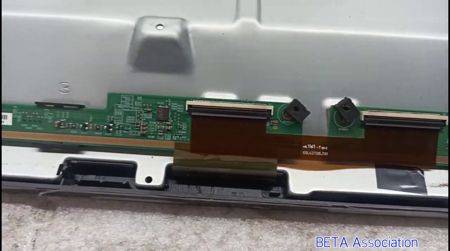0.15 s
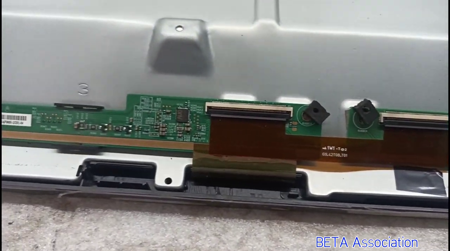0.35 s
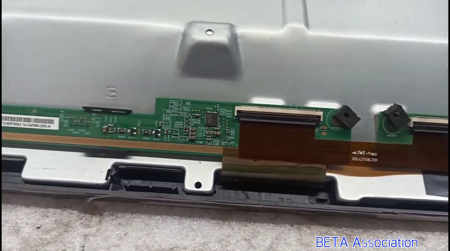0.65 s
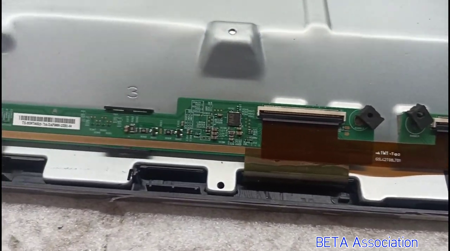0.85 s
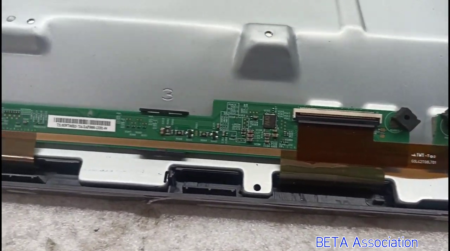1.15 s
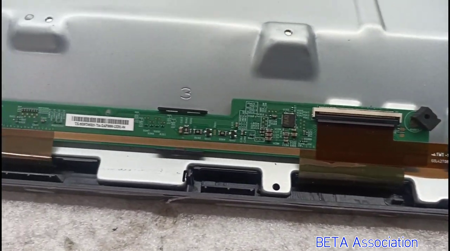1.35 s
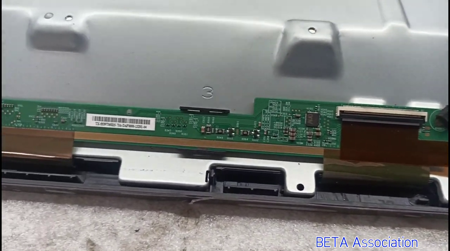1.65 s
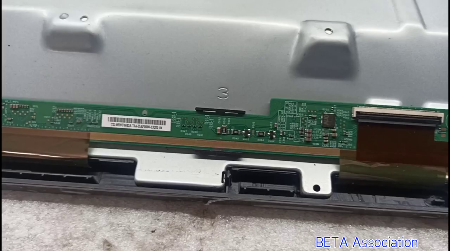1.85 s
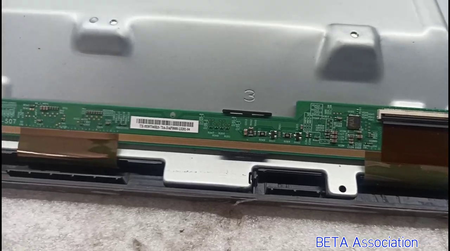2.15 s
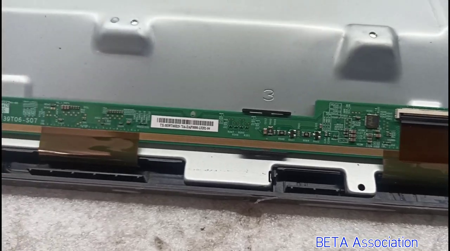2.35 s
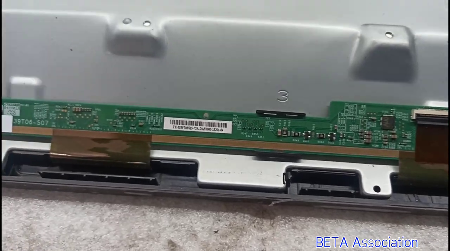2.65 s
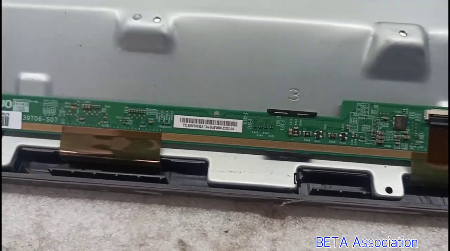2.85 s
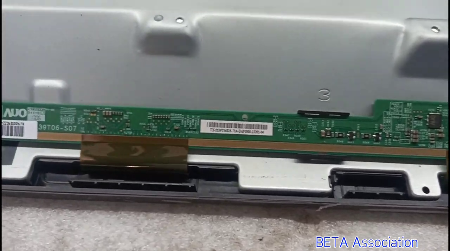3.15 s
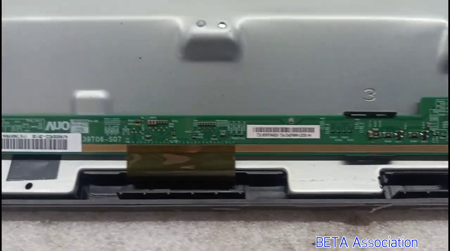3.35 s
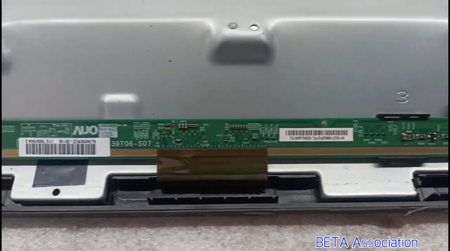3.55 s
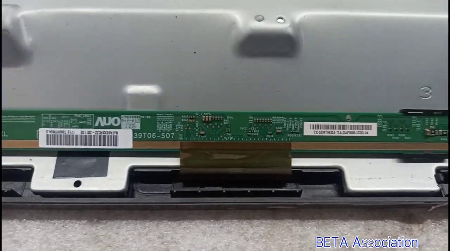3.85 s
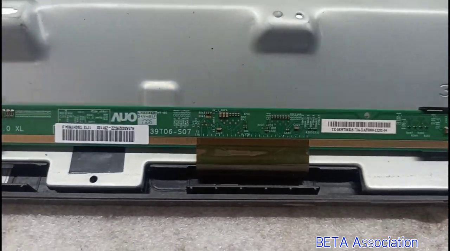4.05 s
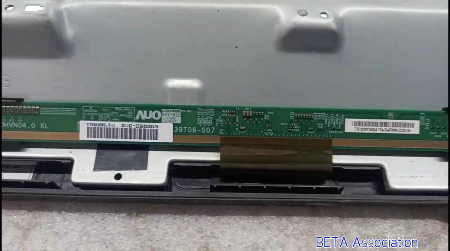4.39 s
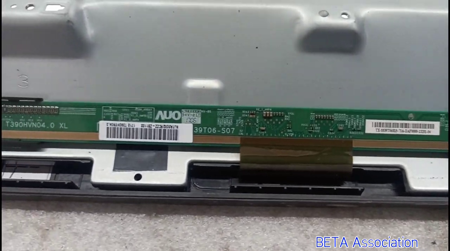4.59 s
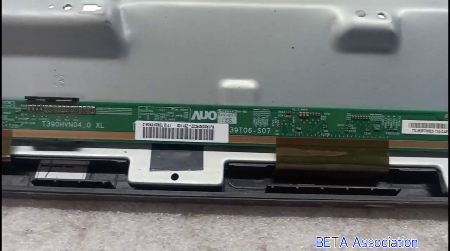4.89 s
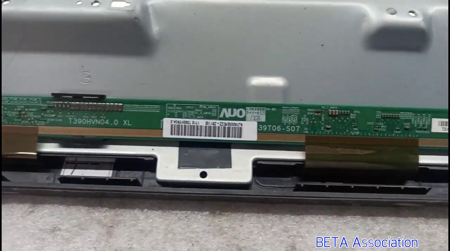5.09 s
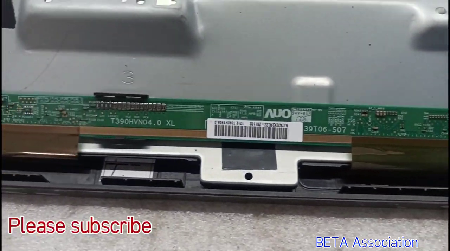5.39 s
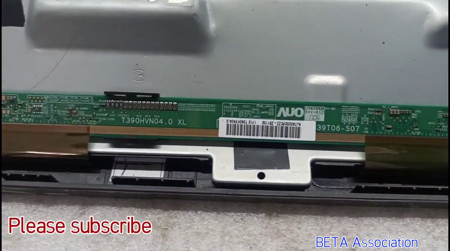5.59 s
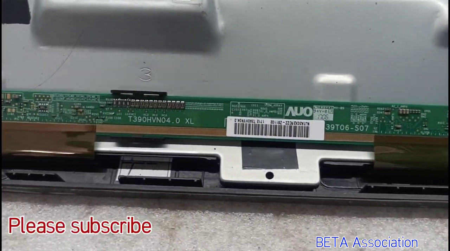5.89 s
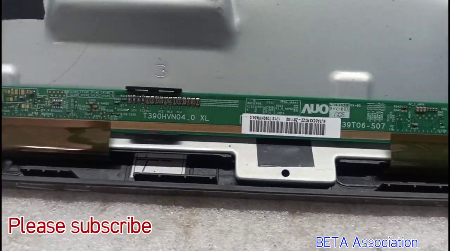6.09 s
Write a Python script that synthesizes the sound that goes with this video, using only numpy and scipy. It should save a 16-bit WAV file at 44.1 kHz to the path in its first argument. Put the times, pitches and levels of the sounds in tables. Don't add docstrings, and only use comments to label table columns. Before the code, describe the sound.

From an open workshop, a slow engine drones away down the street, its low buzzing hum fluttering and weakening. A faster vehicle swishes past in the first second, its pitch sinking. Tyre noise and soft hiss remain. Midway, cloth and soles scuff close to the microphone with a tiny rattle; near the end comes a knock ending in a sharp click.

```python
import sys
import numpy as np
from scipy import signal
from scipy.fft import rfft, irfft, next_fast_len
from scipy.io import wavfile
from scipy.ndimage import uniform_filter1d, map_coordinates

SR = 44100
rng = np.random.default_rng(int(sys.argv[2]) if len(sys.argv) > 2 else 0)


def bounce(signal):
    frames = np.transpose(np.atleast_2d(signal))
    limited = np.clip(frames, -1, 1)
    pcm = np.round(limited * 32767).astype(np.int16)
    wavfile.write(sys.argv[1], SR, pcm)


def voltage_ratio(decibels):
    exponent = np.asarray(decibels, float) / 20
    return 10 ** exponent


N = 274743


def unit(x):
    return x / np.sqrt(np.mean(x ** 2) + 1e-20)


def seconds():
    return np.arange(N) / SR


def along(points, hz):
    f, value = np.transpose(points)
    return np.interp(np.log(hz + 1), np.log(f + 1), value)


def curves(rows):
    s, *columns = np.transpose(rows)
    return [np.interp(seconds(), s, column) for column in columns]


def wobble(rate):
    knots = rng.standard_normal(int(N * rate / SR) + 4)
    coarse = np.arange(0, N + 32, 32)
    smooth = map_coordinates(knots, [coarse * rate / SR * (N / (N + 32))])
    return np.interp(np.arange(N), coarse, smooth)


def bell(s, rise, fall, pointed=False):
    t = seconds() - s
    u = np.abs(t) / np.where(t < 0, max(rise, 1e-3), max(fall, 1e-3))
    return np.exp(-u if pointed else -u * u)


def nearness(s, coming, going):
    t = seconds() - s
    return 1 / np.hypot(1, t / np.where(t < 0, coming, going))


def filtered(x, response):
    m = next_fast_len(N + 8192)
    return irfft(rfft(x, m) * response(np.fft.rfftfreq(m, 1 / SR)), m)[..., :N]


# f/Hz, left-right likeness/1
LIKENESS = [(60, 0.79), (130, 0.88), (290, 0.86), (640, 0.7), (1410, 0.15), (3100, 0.021), (6820, 0.036),
            (15000, 0.085)]


def rush(spectrum, patchy_db):
    z = signal.stft(rng.standard_normal((2, N)), nperseg=512)[2]
    field = rng.standard_normal(z.shape[1:])
    field = uniform_filter1d(field, size=6, axis=0)
    field = uniform_filter1d(field, size=12, axis=1)
    pair = signal.istft(z * voltage_ratio(patchy_db * unit(field)), nperseg=512)[1][:, :N]

    def mid_side(hz):
        turn = np.arccos(np.clip(along(LIKENESS, hz), -1, 1)) / 2
        return voltage_ratio(along(spectrum, hz)) * [np.cos(turn), np.sin(turn)]

    mid, side = filtered(pair, mid_side)
    return unit(np.array([mid + side, mid - side]))


def order(cycle_hz, multiple, level_db, waver, fade_db):
    phase = multiple * 2 * np.pi * np.cumsum(cycle_hz) / SR
    phase = phase + waver * wobble(9) + 1.2 * wobble(1.3) + rng.uniform(0, 2 * np.pi)
    apart = .07 * wobble(3)
    level = voltage_ratio(level_db + fade_db * wobble(7))
    return np.sqrt(2) * level * np.sin([phase + apart, phase - apart])


# t/s, firing cycle f/Hz, level/dB of order 6
ENGINE = [(0, 25.98, -34), (.14, 26.62, -40.5), (.27, 25.49, -27.5), (.54, 25.5, -30), (.9, 25.85, -30),
          (1.3, 26.15, -32), (2.05, 26.18, -32.5), (2.3, 25.96, -30), (2.55, 26.07, -33), (2.9, 26, -38.5),
          (3.75, 26.14, -34), (4.05, 25.47, -40), (4.6, 25.42, -38), (5.1, 25.36, -44), (5.5, 25.45, -44.5),
          (5.83, 25.82, -42.5), (6, 25.41, -53), (6.23, 25.17, -57)]
# multiple/1, starting level/dB, sinking rate/(dB/s)
BESIDE_ORDERS = [(5, -40, -1.22), (7, -45, -1), (8, -51.5, -.5)]
# multiple/1, level/dB
WEAK_ORDERS = [(3, -61.5), (4, -52.5), (10, -57.5), (11, -56), (12, -54.5), (13, -54), (16, -60),
               (18, -58.5)]
# multiple/1, t/s, half-width/s, level change/dB
ECHO_PATHS = [(6, 0.425, 0.035, -5.5), (6, 0.912, 0.062, 3), (6, 1.203, 0.1, -10), (6, 1.96, 0.071, 3.5),
              (6, 3.12, 0.11, -24), (6, 3.2, 0.037, 5.5), (6, 3.5, 0.11, -8), (6, 4.13, 0.059, 2),
              (6, 4.23, 0.048, -10), (6, 4, .04, -7), (6, 4.9, 0.037, 3), (6, 5.53, .05, 5),
              (6, 2.95, .07, 0), (6, 0.18, .03, 7.5), (5, 3.6, 0.088, 3.5), (7, .1, .15, -5),
              (7, 2.8, 0.26, -7.5), (8, 4.33, 0.036, 4.5), (4, 2.9, .12, 10), (4, 2, .2, 4),
              (5, 0.55, 0.16, -10), (5, 1.02, .09, -14), (5, 1.3, 0.46, 1), (5, 2.36, 0.21, -9),
              (5, 3.45, 0.31, 3.5), (5, 4.04, 0.16, -10), (5, 5.7, 0.45, -14), (7, 0.54, .08, 7.5),
              (7, 1.198, 0.25, 4), (7, 2.05, 0.04, 10.5), (7, 3.453, 0.18, -14), (7, 3.5, 0.047, 11),
              (7, 4.94, 0.13, 7), (8, 0.31, 0.036, 12), (8, 4.33, 0.2205, 10.5), (8, 4.75, 0.26, 11),
              (5, 4.82, 0.14, -1), (6, 3.66, 0.051, -4), (6, 3.95, .06, 0), (8, 4.45, 0.044, -3),
              (8, 4.68, .05, -4), (8, 3.1, .25, 0), (8, 2.13, .12, 6.5), (8, 1, .15, 5), (11, 3.2, .15, 7),
              (11, 4.94, .25, 4.5), (10, 5.05, .2, 9), (4, 4.11, .2, 6),
              (6, .53, .04, 3), (6, 0.64, .04, -3.5), (6, 2.12, .05, -3), (6, 5.85, 0.039, -5),
            (6, 4.4, .08, 2.5), (5, 1.97, .08, 3), (5, 4.42, .1, 5), (5, 5.02, .08, 4.5), (5, 1.2, .08, 4),
            (7, 4.1, .06, 9), (7, 4.55, 0.058, 4), (8, 4.12, .06, 7), (8, 4.55, .08, 3.5), (6, 3, .06, -2),
            (6, 1.25, .06, 3)]


def drone():
    cycle_hz, main_db = curves(ENGINE)
    t = seconds()
    blur = .05 + .035 * t

    def paths_db(k):
        return sum(db * bell(s, width, width) for m, s, width, db in ECHO_PATHS if m == k)

    out = order(cycle_hz, 6, main_db + paths_db(6), waver=blur, fade_db=.2 + 3 * blur)
    for k, db, sink_db in BESIDE_ORDERS:
        level_db = db + sink_db * t + paths_db(k)
        out = out + order(cycle_hz, k, level_db, waver=.1 + 1.5 * blur, fade_db=.6 + 4 * blur)
    for k, db in WEAK_ORDERS:
        out = out + order(cycle_hz, k, db + paths_db(k), waver=.12 * k, fade_db=.35 * k)
    return out


# multiple/1, level/dB, loudest t/s, half-width/s
PASSING_ORDERS = [(2, -46, 0.62, 0.57), (7, -43, 0.92, 0.48), (9, -44, 1, 1.1), (10, -42, 0.96, 0.14)]


def passer():
    firing_hz, closest_s, speed_m_s, kerb_m, corner_s = 41.85, .65, 9, 7.2, 2.6
    t = seconds()
    away_m = speed_m_s * (t - closest_s)
    cycle_hz = firing_hz * (1 - speed_m_s / 343 * away_m / np.hypot(away_m, kerb_m))
    out = 0
    for k, db, s, width in PASSING_ORDERS:
        out = out + nearness(s, width, width) ** 2 * order(cycle_hz, k, db, waver=.12 * k, fade_db=.3 * k)
    return voltage_ratio(-30 * np.clip(t - corner_s, 0, None)) * out


# loudest t/s, distance over speed coming/s and going/s
WHEEL_PASSES = [
    (.62, 0.39, 0.61),
    (3.75, 0.68, 1),
]
# bed level/dB, sinking rate/(dB/s), first and second vehicle level/dB
STREET_LAYERS = [
    (-40.5, -0.071, -47.5, -64),
    (-42.5, -0.39, -40.5, -56),
    (-49.5, -0.48, -43, -43.5),
]
# f/Hz, level/dB per Hz
RUMBLE_SPECTRUM = [(20, -33), (42, -42), (65, -30), (95, -12), (155, -2), (225, -11.5), (300, -1),
                   (440, -1.5), (530, -8), (1000, -9), (1300, -40), (2600, -100)]
# f/Hz, level/dB per Hz
TYRE_SPECTRUM = [(290, -2), (500, -14.5), (585, -5.5), (672, -4.5), (1070, -6.5), (1170, 1), (1800, -6),
                 (4000, -12), (5200, -28.5), (8800, -120)]
# f/Hz, level/dB per Hz
HISS_SPECTRUM = [(900, -48), (2000, 0), (2700, -7), (4500, 2.5), (6000, -3), (8000, -4.5), (12000, -13.5),
                 (15500, -21)]


def street():
    near = [nearness(*wheels) ** 2 for wheels in WHEEL_PASSES]
    rumble, tyres, hiss = [voltage_ratio(bed_db + sink_db * seconds()) + voltage_ratio(lift_db) @ near
                           for bed_db, sink_db, *lift_db in STREET_LAYERS]
    swell = wobble(4.864)
    rumble = rumble * voltage_ratio(0.48 * wobble(2.95)) * rush(RUMBLE_SPECTRUM, patchy_db=0.85)
    tyres = tyres * voltage_ratio(2.5 + 0.46 * swell) * rush(TYRE_SPECTRUM, patchy_db=1.0)
    hiss = hiss * voltage_ratio(.3 + .7 * swell) * rush(HISS_SPECTRUM, patchy_db=1.2)
    return rumble + tyres + hiss


# peak t/s, level/dB, rise/s, fall/s, dullness/dB
STROKES = [(2.43, -47, 0.022, 0.083, 1), (2.668, -37.5, 0.021, 0.047, -5), (3, -40, 0.012, 0.025, 2),
           (3.045, -42, .015, 0.029, -1), (3.125, -42.5, 0.047, 0.03, -8), (3.152, -39.5, 0.034, 0.013, -1),
           (3.172, -38, .012, 0.05, 1), (3.205, -44.5, 0.016, 0.017, -3.5),
           (3.233, -45.5, 0.013, 0.032, -0.5), (3.512, -47, 0.019, .01, 5), (3.78, -47, 0.081, 0.54, 0),
           (4.34, -60, 0.044, 0.049, 5), (4.535, -46.5, 0.067, 0.04, -4), (4.68, -58, .05, 0.061, 5),
           (4.88, -54, .06, 0.059, 6), (5.62, -52.5, 0.12, 0.041, 6), (5.8, -46, .03, 0.04, -17)]
# f/Hz, level/dB per Hz
CLOTH_SPECTRUM = [(500, -1), (1300, 1.5), (2500, -1.5), (4500, 2), (6800, 0.5), (9000, -2.5),
                  (13000, -10.5), (15500, -12)]


def scuffs():
    swells = np.array([voltage_ratio(db) * bell(s, rise, fall, pointed=True) for s, db, rise, fall, _ in STROKES])
    rub = rush(CLOTH_SPECTRUM, patchy_db=0.2)
    heavy = filtered(rub, lambda hz: 1 / (1 + (hz / 5200) ** 6))
    grain = voltage_ratio(1.8 * wobble(160) + .5 * wobble(30))
    dullness = voltage_ratio(np.clip(np.transpose(STROKES)[-1], -15, 6))
    strokes = swells.sum(axis=0) * (rub - heavy) + dullness @ swells * heavy
    return voltage_ratio(5.5) * unit(grain) * strokes


# t/s, peak level/dB, ring f/Hz, decay time T60/s, crack's upper f/Hz
CONTACTS = [
    (3.0465, -25, 2800, .018, 5000),
    (3.151, -31, 4650, .03, 7000),
    (3.164, -28, 4600, .03, 7000),
    (3.179, -31, 4550, .03, 7000),
    (3.199, -33, 6600, .03, 8000),
    (5.5005, -19, 260, .012, 900),
    (5.5152, -14, 760, .006, 1400),
    (5.5165, -10, 1100, .003, 3500),
]


def ticks():
    out, t = np.zeros((2, N + SR)), np.arange(SR // 8) / SR
    for s, db, hz, t60, top_hz in CONTACTS:
        rise = 1 - np.exp(-t * hz)
        ring = np.sin(2 * np.pi * hz * t) * voltage_ratio(-60 * t / t60) * rise
        lowpass = signal.butter(4, top_hz, fs=SR, output="sos")
        dull = unit(signal.sosfilt(lowpass, rng.standard_normal(len(t))))
        crack = .06 * voltage_ratio(-60 * t / .015) * dull
        start = round(s * SR)
        out[:, start:start + len(t)] += voltage_ratio(db) * (ring + crack)
    return out[:, :N]


def scene():
    return drone() + passer() + street() + scuffs() + ticks()


def low_pass(x):
    return signal.sosfilt(signal.butter(12, 15510, fs=SR, output="sos"), x)


BAND_EDGES = [4800, 6080, 7650, 8530, 10100, 11000, 11510, 12900]
BAND_STEPS = [-5, 5.5, -2.5, -12.5, -3, -19, 34, 2.5]
# f/Hz, half-width/Hz, level/dB
HOUSING_RIPPLES = [(1165, 53, -2), (1540, 99, 2), (1830, 110, -1), (2080, 120, 1.5), (2650, 200, -0.5),
                   (3170, 100, 1.5), (4900, 130, -1), (5460, 150, 1), (6600, 150, 1.5), (7000, 110, -2.5),
                   (7870, 90, -4)]
# f/Hz, left minus right level/dB
PORT_LEAN = [(100, -.5), (400, .3), (800, 0), (1300, -.5), (2400, -5), (4400, -5), (6000, -2), (8100, 1),
             (15000, -3)]


def record(dry):
    def response(hz):
        steps_db = sum(db * (hz > edge_hz) for edge_hz, db in zip(BAND_EDGES, BAND_STEPS))
        ripple_db = sum(db * np.exp(-((hz - mid_hz) / width_hz) ** 2)
                        for mid_hz, width_hz, db in HOUSING_RIPPLES)
        lean_db = along(PORT_LEAN, hz) * [[.5], [-.5]]
        passband = (hz < 15510) * (.17 + .83 / (1 + (66 / (hz + 1)) ** 6))
        return voltage_ratio(steps_db + ripple_db + lean_db) * passband

    return low_pass(filtered(dry, response))


dry = scene()
out = record(dry)
bounce(out)
```